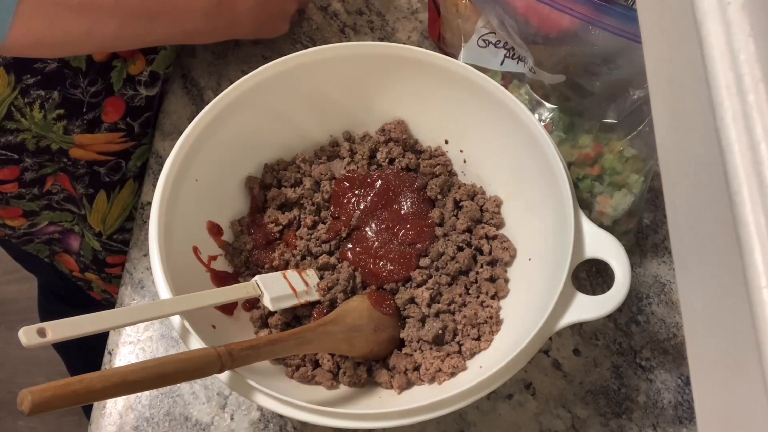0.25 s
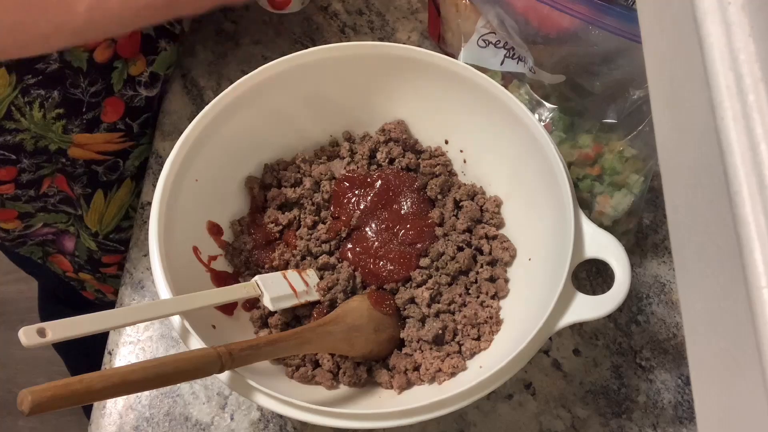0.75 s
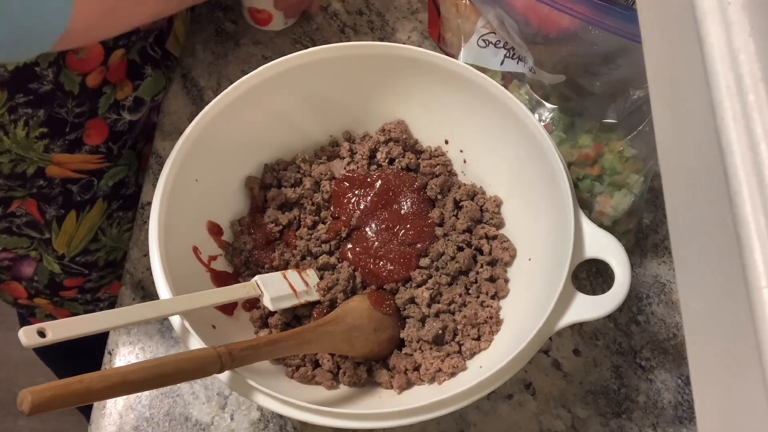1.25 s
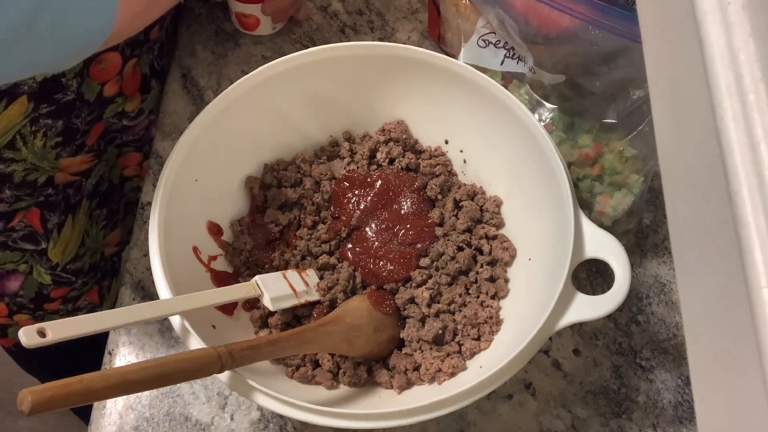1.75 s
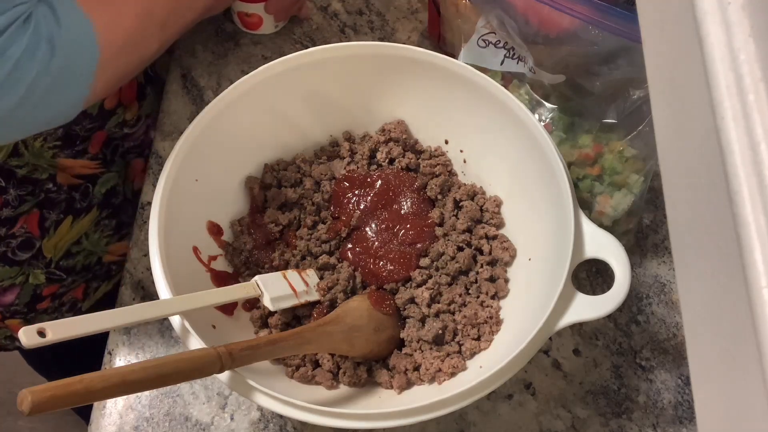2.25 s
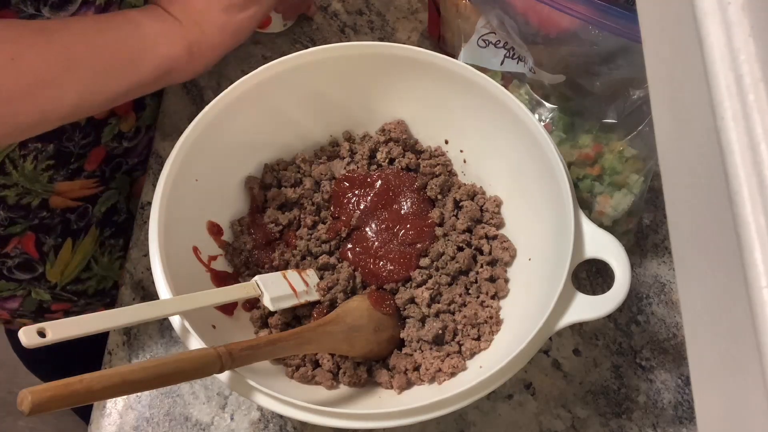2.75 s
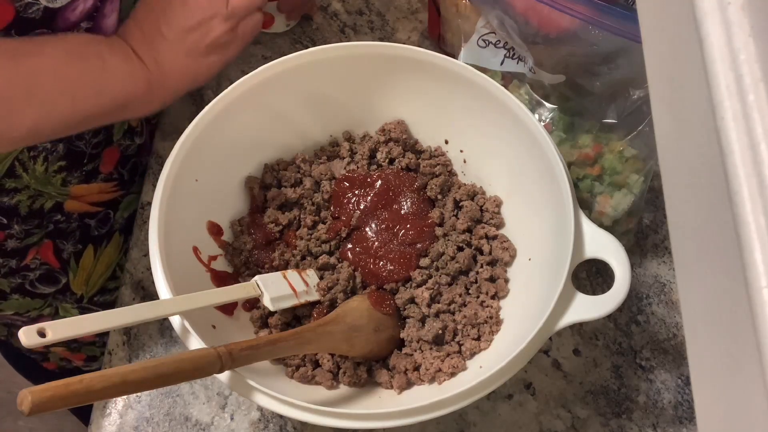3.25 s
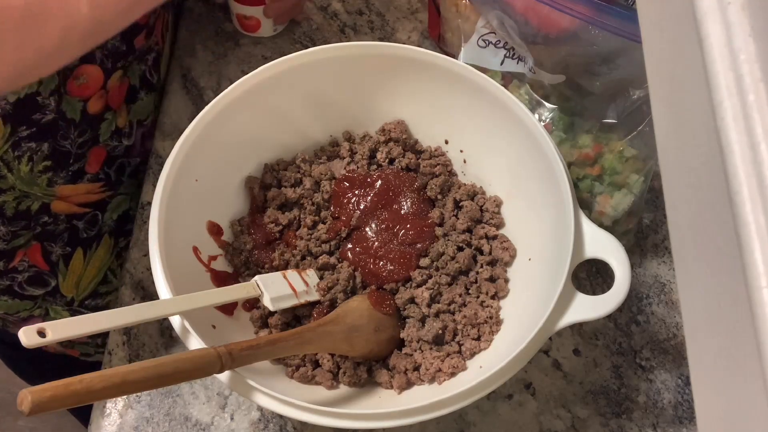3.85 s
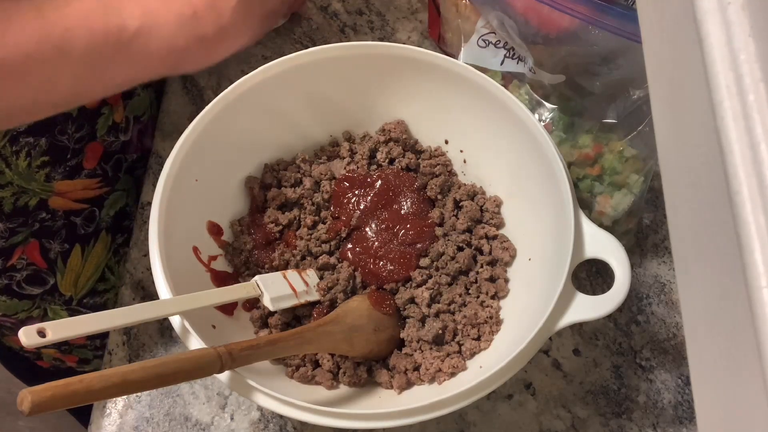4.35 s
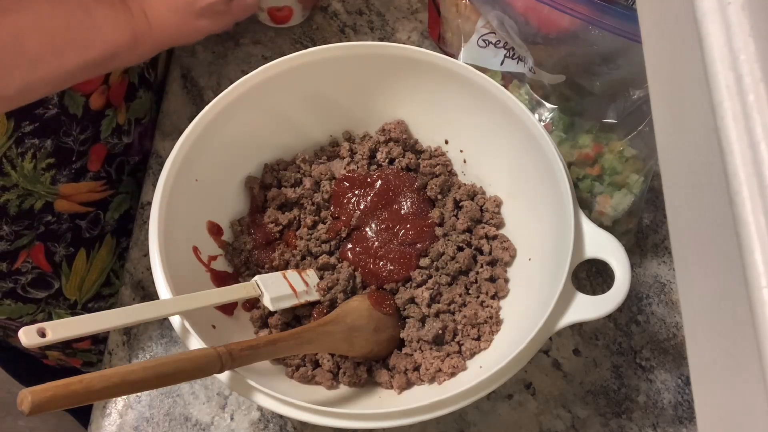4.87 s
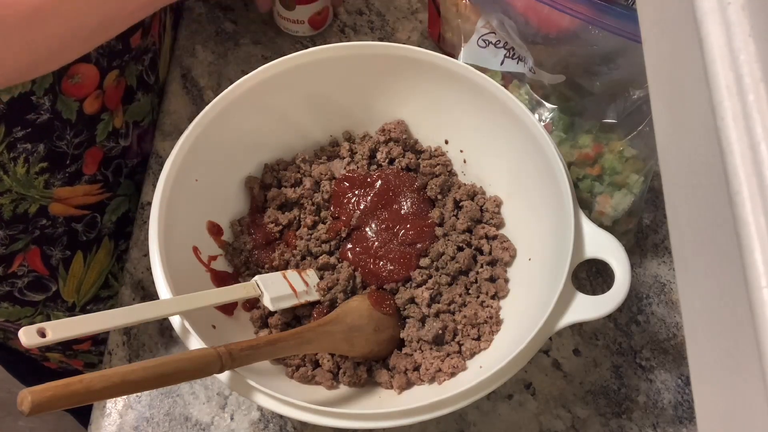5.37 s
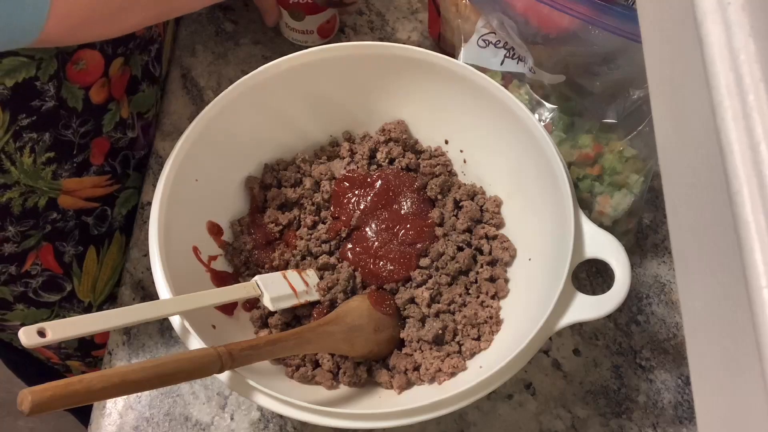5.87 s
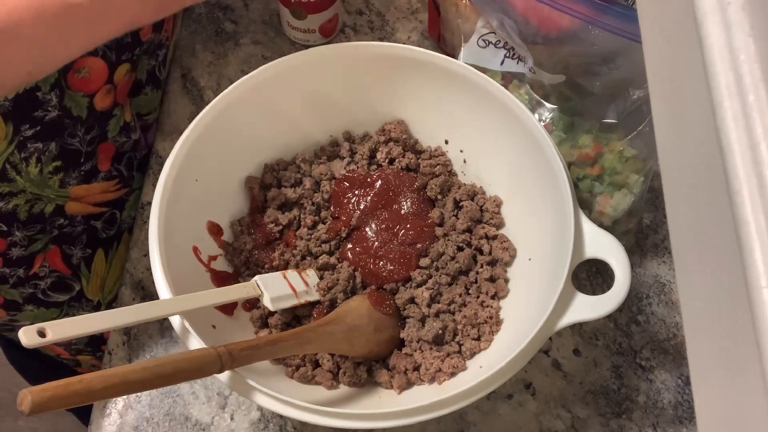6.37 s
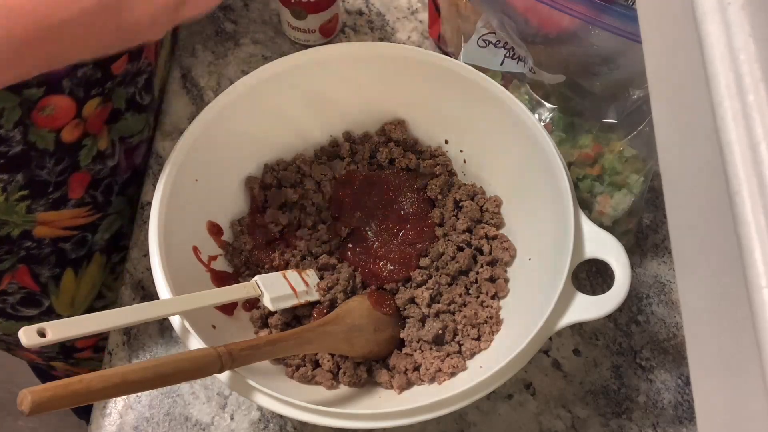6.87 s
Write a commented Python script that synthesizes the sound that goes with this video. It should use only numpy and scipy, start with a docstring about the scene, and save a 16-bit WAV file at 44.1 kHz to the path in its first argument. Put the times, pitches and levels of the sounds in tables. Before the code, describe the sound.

A can opener's jaws snap with a loud, briefly ringing clack at about 0.4 seconds. From 0.6 to 1.1 seconds plastic ticks and crackles close by, while two things thud onto a stone counter. A tin slides faintly, then clinks and scrapes sharply at about 2.1 seconds. A quieter stretch follows, with soft hand bumps, rubbing, light scrapes and small taps. At about 4.9 seconds the opener drops with a hard, bright clatter and a short rustle, followed by sharp plastic ticks, the strongest near 5.2 seconds. The tin clinks and scrapes lightly between 5.5 and 5.9 seconds, and plastic ticks again. From 6.5 seconds a wooden drawer slides on rough runners, and a few dull thuds come at around 7 seconds. A fridge hums faintly throughout, and the kitchen walls add short echoes.

```python
"""A can opener and a tin are handled on a stone kitchen counter. The opener's jaws clack, and later it is
dropped; the tin scrapes over grit and clinks. Each knock rings a few fading tones of the thing that is hit.
Soft things thud, hands bump and rub, plastic ticks and rustles, and at the end a wooden drawer slides on
rough runners. A fridge hums under it all, and the walls add short echoes."""
import sys
import numpy as np
from scipy import signal
from scipy.io import wavfile

SR = 44100
rng = np.random.default_rng(int(sys.argv[2]) if len(sys.argv) > 2 else 0)


def waveform_to_disk(signal):
    """Save audio, clipped to [-1, 1], as 16-bit WAV at the path in sys.argv[1]."""
    frames = np.transpose(np.atleast_2d(signal))
    scaled = np.clip(frames, -1, 1) * 32767
    samples = np.round(scaled).astype(np.int16)
    wavfile.write(sys.argv[1], SR, samples)


N = 313992

# Levels are relative. t60 is the time to fade by 60 dB. A mode is a tone that a thing rings at.
# fridge hum: f/Hz, width/Hz, level/dB
FRIDGE_HUM = [(63, 6.1, -65), (151, 13, -70), (228, 4.5, -68.5), (364.6, 22, -68), (469, 22, -73)]
# tone color of room air, leaning, rubbing and rustling: f/Hz, level/dB
AIR_COLOR = [(15, -38), (25, -15.5), (59, -8), (114, -13), (236, -1.5), (293, -0.5), (373, -14), (775, -16),
             (2280, -17), (7310, -37), (10400, -30), (13600, -44), (16000, -72)]
LEAN_COLOR = [(24, -27.5), (40, -5), (113, 1.5), (482, -5.5), (563, -18), (625, -8.5), (900, -17),
              (1170, -44.5), (1980, -120)]
RUB_COLOR = [(290, -35.5), (500, -10), (647, -5.5), (912, -8), (1080, -5), (1330, -6.5), (1970, -13),
             (6500, -31.5), (8450, -59), (14300, -120)]
RUSTLE_COLOR = [(2650, -21), (4500, 2.5), (5930, -10), (6590, -5), (7260, -3.5), (8330, -10), (13100, -3.5),
                (14500, -4), (16000, -26.5)]
# hands, sleeves and bags moving: t/s, leaning level/dB, rubbing level/dB, rustling level/dB
HAND_MOVES = [(0.0, -61, -69.5, -108), (0.36, -60, -68, -101), (0.5, -58.5, -64.5, -78),
              (0.79, -55.5, -63, -64), (1.19, -56, -57, -71.5), (1.63, -57.5, -66.5, -77),
              (2.08, -56.5, -60, -76.5), (2.26, -50.5, -56.5, -59), (2.52, -61.5, -68, -87.5),
              (3.11, -59.5, -69.5, -78.5), (3.45, -64.5, -73, -93.5), (3.86, -58.5, -66, -102),
              (4.28, -61, -74.5, -86), (4.68, -55.5, -63, -71), (4.82, -49.5, -62.5, -66.5),
              (4.94, -55, -48.5, -39.5), (5.1, -54.5, -89, -65), (5.29, -56.5, -67.5, -73),
              (5.69, -56.5, -66.5, -104.5), (6.01, -64, -67.5, -76.5), (6.31, -65, -71, -79.5),
              (6.58, -60, -75.5, -74.5), (6.76, -54, -46, -57.5), (6.86, -52, -54, -63),
              (7.12, -57.5, -58.5, -55.5)]
# knocks: t/s, level/dB, favored f/Hz, ring length (0-1), crack against ring/dB
OPENER_CLACKS = [(.129, -44, 1290, 0.4, -20.5), (.151, -44, 1288, 0.6, -21),
                 (.3303, -12.5, 1020, 0.34, -4.5), (.3668, -2, 1200, 0.2, -12),
                 (.3718, -11, 1247, 0.2, -15), (.3765, -19, 850, 0.4, -25.5), (.383, -20, 900, 0.2, -22),
                 (.394, -19, 1000, 0.6, -25.5), (.404, -26.5, 950, 0.4, -23),
                 (.42, -33.5, 1050, 0.9, -25.5)]
SOFT_THUDS = [(.372, -29.5, 204, 0.8, -49.5), (.691, -20.5, 900, 0.34, -10.5), (.862, -20.5, 734, 0.7, -12),
              (.875, -25.5, 152, 1, -34), (1.518, -39.5, 451, 0.99, -1), (2.11, -30, 180.4, 1, -35),
              (2.25, -32.5, 290, 1, -23), (3.623, -35, 636, 1, -46), (3.779, -35.5, 654, 0.9, -2.5),
              (3.905, -40, 204, 0.32, -27.5), (4.39, -41, 330, 1, -36), (4.885, -40.5, 559, 1, -15),
              (4.938, -43, 150.6, 0.8, -29), (5.578, -39, 472, 0.56, -17), (5.876, -39, 485, 0.76, -30.5),
              (5.712, -37.5, 194, 0.96, -29), (6.558, -39.5, 244.6, 0.52, -28), (6.93, -40, 107, 0.7, -24),
              (6.95, -35, 107, 0.1, -32), (6.985, -35, 90, 0.52, -27), (7.012, -38, 92, 0.25, -38),
              (7.06, -41, 89, 1, -27), (7.084, -38, 500, 0.6, -17), (7.091, -24, 239, 0.52, -30),
              (7.106, -21.5, 101, 1, -39)]
TIN_CLINKS = [(2.066, -28, 736, 1, 4), (2.068, -26, 3370, 0.7, -1), (2.074, -32, 1050, 0.5, 4),
              (2.083, -45, 3400, 0.5, -13), (2.094, -16.5, 1040, 1, -29), (2.101, -26, 1740, 0.5, -24),
              (2.1035, -17, 1254, 0.16, -8), (2.106, -40, 3600, 0.6, -16), (2.11, -19.5, 1750, 0.15, -23),
              (2.113, -17.5, 1264, 0.5, -14), (2.114, -46, 3430, 0.5, -25), (2.12, -27.5, 1710, .35, -37.5),
              (4.310, -35.5, 1470, 0.1, -5.5), (4.311, -39.5, 4200, 0.1, 5.5),
              (4.377, -49.5, 4500, 0.15, 8), (4.721, -42, 1673, 1, 4), (4.883, -22, 533, 0.73, -18),
              (4.8845, -16.5, 4700, 0.1, 3), (4.885, -29.5, 1600, 0.04, 1), (4.8895, -30, 533, 0.53, -13),
              (5.576, -38.5, 2030, 0.53, -14), (5.577, -50, 2800, 0.5, -16), (5.708, -40, 2100, 0.17, 0),
              (5.711, -46, 5320, 0.6, -11), (5.745, -49, 2150, 0.5, -29.5), (5.783, -50.5, 1700, 0.9, 4.5),
              (5.874, -31.5, 3330, 0.02, -2), (5.877, -36.5, 1670, 0.65, -19), (5.872, -36, 5000, 0.5, -3),
              (5.895, -47.5, 4250, 0.93, -17), (5.905, -49.5, 10700, 0.4, 12)]
HAND_BUMPS = [(2.80, -44, 300, 0.92, -33.5), (2.811, -45.5, 204, 0.53, -32), (2.826, -54, 229.5, 0.8, -34),
              (3.28, -45, 198.3, 0.72, -41.5), (3.292, -43, 393, 0.73, -42.5)]
# modes of the things that are hit: f/Hz, level/dB, t60/s
OPENER_MODES = [(750, -15, 0.03), (898, -18.5, 0.09), (1000, -10.5, 0.18), (1137, 1.5, 0.058),
                (1160, -5, 0.1), (1240, -3.5, 0.018), (1435, 2, 0.065), (1770, -10, 0.015),
                (2389, -11.5, 0.049), (2900, -24, .02), (3620, -3, 0.038)]
COUNTER_MODES = [(75, -8, .1), (105, -3, .1), (150, 0, .1), (222, -2, .07), (280, -4, .05), (370, -2, .05),
                 (463, -2, .045), (614, -5, .04), (861, -7, .03), (980, -8, .03), (1210, -10, .03),
                 (1520, -15, .025), (2370, -22, .02)]
TIN_MODES = [(465, -2, .05), (610, -4, .05), (1070, -5, .06), (1180, -7, .07), (1300, -5, .05),
             (1685, -3, .1), (1870, -9, .05), (2150, -4, .14), (2400, -8, .12), (2850, -13, .06),
             (3200, -5, .1), (3400, -12, .04), (3610, -11, .05), (3890, -15, .04), (4175, -6, .12),
             (4400, -18, .1), (4665, -6, .1), (5400, -16, .05), (6110, -8, .08), (8420, -13, .08),
             (10600, -18, .08), (11750, -22, .07)]
# scrapes and rubs over grit: the tin dragged, a light touch, the lid and other held things: t/s of hardest
# push, length/s, level/dB, hiss against ring/dB, favored f/Hz
SCRAPE_STROKES = [(0.325, 0.022, -42.5, -31.5, 1194), (0.362, 0.015, -34.5, -32.5, 1203),
                  (1.278, 0.47, -53, -44, 640), (1.2, 0.093, -75, -36, 960), (1.3, 0.12, -53, -28, 610),
                  (1.33, 0.064, -53, -16, 1080), (2.074, 0.019, -27.5, -16.5, 1090),
                  (2.106, 0.023, -18.5, -40.5, 1540), (2.108, 0.054, -26.5, -30.5, 3510),
                  (2.173, 0.092, -44.5, -49, 1916), (2.212, 0.062, -40.5, -31.5, 1490),
                  (2.231, 0.12, -35.5, -36.5, 2260), (2.809, 0.051, -54, -8, 1400),
                  (2.855, 0.14, -58.5, -29, 1250), (3.258, 0.24, -73, 2.5, 3330),
                  (3.532, 0.083, -77, 6.5, 3440), (3.832, 0.11, -58, -16, 1205), (3.95, 0.45, -85, -24, 3390),
                  (4.66, 0.076, -54, -26.5, 480), (4.72, .12, -48, -28, 650), (4.8, 0.08, -61.5, -24, 1160),
                  (4.728, 0.047, -42.5, -5, 1690), (4.873, 0.01, -41, -4, 3996), (5.109, 0.16, -53, -8, 1660),
                  (5.466, 0.56, -61, -21, 1140), (5.83, 0.096, -52, -23, 3760),
                  (5.85, 0.045, -46.5, -21, 4180), (5.908, 0.065, -70.5, -12, 3380),
                  (5.909, 0.0094, -60, -1, 4200)]
# plastic ticking: t/s, level/dB, f/Hz, dull part/dB, crackle afterwards/dB
PLASTIC_TICKS = [(.5375, -53, 13000, -15, -32), (.5735, -50, 12900, -12, -25),
                 (.617, -47.5, 13000, -20, -8), (.6215, -28.5, 12700, -24, -1),
                 (0.641, -20.5, 13500, -21, -9), (0.655, -16, 11640, -16, -7),
                 (.7275, -31, 12700, -25, -24), (0.8233, -28.5, 11000, -20.5, -14),
                 (.884, -34, 11000, -20.5, -23), (0.9065, -19.5, 11700, -17, -18),
                 (.944, -32, 11000, -11, -15), (0.957, -18, 11000, -12, -10), (1.0635, -28, 7640, -7.5, -8),
                 (1.519, -34, 9200, -24, -9), (1.606, -44, 8600, -21, -17), (3.7245, -35.5, 10100, -16, -4),
                 (4.6075, -35, 12150, -15, -26), (4.845, -38, 8000, -33, -20),
                 (5.0268, -20.5, 11500, -23, -23), (5.038, -40, 11000, -20, -25),
                 (5.169, -8, 10800, -21, -34), (5.2474, -24, 10300, -19.5, -15),
                 (6.063, -48, 10400, -36, -13.5), (6.078, -42.5, 12800, -22, -28),
                 (6.1095, -41.5, 10540, -18, -7), (6.1607, -47, 13300, -11, -16),
                 (6.2119, -29, 10900, -23, -10), (6.9523, -33, 8900, 1, -7), (7.087, -39, 6100, -19, -16)]
# the dropped opener landing: t/s, level/dB, t60/s
LANDINGS = [(4.876, -29, 0.1), (4.882, -15.5, 0.05), (4.8842, -7.5, 0.012), (4.8888, -14.5, 0.012),
            (4.965, -27.5, 0.026)]
# the drawer moving: t/s, level/dB, runners against box/dB
DRAWER_SLIDE = [(6.53, -60, -10), (6.546, -64, -18), (6.585, -47.5, -31.5), (6.63, -40, -35),
                (6.67, -38.5, -22), (6.71, -39.5, -7), (6.784, -43.5, -16), (6.794, -48, -1),
                (6.824, -38, -8.5), (6.836, -60, -8), (6.9, -81, -13)]
# modes of the scraped things, dropped opener and drawer box: f/Hz, width/Hz, level/dB
SCRAPE_MODES = [(475, 40, 1), (650, 90, -6), (960, 70, -5), (1159, 100, 1), (1311, 55, -3.5),
                (1490, 45, -5), (1685, 40, 1), (1760, 45, -7), (1900, 60, -2), (2040, 50, -9),
                (2200, 30, 4), (3190, 50, -4), (3393, 60, -1), (3620, 60, -2), (3890, 120, -8.5),
                (4090, 43, -5.5), (4680, 76, -12.5), (5790, 220, -9)]
DROP_MODES = [(494, 68, 0), (612, 8.7, 8), (1184, 29, -5.5), (1470, 17, -0.5), (1800, 78, -5.5),
              (2410, 190, -7), (4224, 350, -3.5), (4680, 590, -6.5), (5700, 330, -6), (7950, 50, 5.5),
              (8100, 120, 5), (10760, 40, 1.5), (10600, 120, -2), (11300, 80, -9), (13270, 73, 4.5)]
DRAWER_MODES = [(204.3, 20.3, 5), (391.5, 76, 2.5), (603, 170, -2), (880, 7.1, 8), (1246, 45, -8.5),
                (1724, 40, -4.5), (2010, 25, -4), (2624, 48, -8), (2830, 17, -9)]
# how alike left and right sound: f/Hz, likeness (1 = the same, 0 or less = unrelated)
STEREO_LIKENESS = [(60, 0.9), (180, 0.8), (550, -0.23), (1650, -0.37), (4970, 0.45), (15000, 0.2)]
# how long the kitchen rings: f/Hz, t60/s
ROOM_FADE = [(64, 0.54), (250, 0.24), (1000, 0.24), (4000, 0.2), (15000, 0.16)]
# echoes from near walls and cupboards: t/s of delay, level/dB
WALL_ECHOES = [(.0048, -4.5), (.0092, -12), (0.0154, -10.5), (0.028, -15.5)]


def amp(db):
    """Turn decibels into a gain."""
    return 10 ** (np.asarray(db) / 20)


def unit_level(x):
    """Scale a signal to an average power of 1."""
    return x / np.sqrt(np.mean(x ** 2) + 1e-20)


def over_time(rows):
    """Join each column of levels with straight lines; silent outside the table."""
    times, *columns = np.transpose(rows)
    return [np.interp(np.arange(N) / SR, times, db, left=-150, right=-150) for db in columns]


def at_hz(points, hz):
    """Read a table's value at one frequency."""
    freqs, values = np.transpose(points)
    return np.interp(np.log(hz), np.log(freqs), values)


def drift(rate_hz):
    """A slow random wobble of about size 1."""
    step = 40   # samples between points
    pole = np.exp(-2 * np.pi * rate_hz * step / SR)
    slow = signal.lfilter([1], [1, -2 * pole, pole ** 2], rng.standard_normal(N // step + 2002))[2000:]
    return np.interp(np.arange(N) / step, np.arange(len(slow)), unit_level(slow))


def filtered(x, hz, kind, order=2):
    """Keep the low part, the high part or one band of a sound."""
    return signal.sosfilt(signal.butter(order, hz, kind, fs=SR, output="sos"), x)


def resonate(x, hz, width_hz):
    """Ring at one pitch; a smaller width rings longer."""
    r = np.exp(-np.pi * width_hz / SR)
    feedback = [1, -2 * r * np.cos(2 * np.pi * hz / SR), r * r]
    return signal.lfilter(np.array([1, 0, -1]) * (1 - r * r) / 2, feedback, x)


def grains(per_s, spread_db):
    """Tiny contacts of uneven size at random times."""
    sizes = amp(spread_db * np.minimum(rng.exponential(1, N), 4.0)) * rng.choice([-1, 1], N)
    return unit_level(sizes * (rng.random(N) < per_s / SR))


def colored(color, flicker_db, noise=None):
    """Shape noise into flickering half-octave bands, in stereo."""
    if noise is None:
        noise = rng.standard_normal((2, 2, N))
    out, edges = 0, 25 * 2 ** np.arange(0, 9.6, .5)
    for k, (low, high) in enumerate(zip(edges, edges[1:])):
        if color[0][0] <= high and low <= color[-1][0]:
            hz = np.sqrt(low * high)
            mid, side = filtered(noise[k % 2], [low, high], "band")   # next-door bands are unrelated
            alike = np.clip(at_hz(STEREO_LIKENESS, hz), 0, 1)
            gain = amp(at_hz(color, hz) + flicker_db * drift(4.8))
            out = out + gain * (np.sqrt(1 + alike) * mid + np.sqrt(1 - alike) * side * [[1], [-1]])
    return unit_level(out)


def knocks(events, modes, focus_db, scatter_db, crack_hz, detune, contact_s):
    """A knock is a short crack plus ringing modes, strongest near its favored pitch."""
    out, t = np.zeros(N + SR), np.arange(SR // 7) / SR
    for s, peak_db, favored_hz, length, crack_db in events:
        strengths, shifts = rng.standard_normal((2, len(modes)))
        knock = np.zeros(len(t))
        for (hz, db, t60), strength, shift in zip(modes, strengths, shifts):
            hz *= 1 + detune * shift   # grip and place shift the modes a little
            age = np.maximum(t - abs(shift) * 0.39 / hz, 0)   # low modes start later
            level_db = db + scatter_db * strength - focus_db * np.log2(hz / favored_hz) ** 2
            fade_db = 60 * age / (t60 * np.clip(length, .05, 1))
            knock += amp(level_db - fade_db) * np.sin(2 * np.pi * hz * age)
        knock *= np.clip(t / contact_s, 0, 1)   # the contact takes a moment to build
        knock /= np.abs(knock).max()
        crack = filtered(rng.standard_normal(400), [crack_hz / 20, crack_hz], "band")
        knock[:400] += amp(crack_db - 60 * t[:400] / 0.032) * crack
        out[round(s * SR):][:len(t)] += amp(peak_db) * knock
    return out[:N]


def shaken_body(contacts, modes, broad_db, waver_db):
    """Contacts ring modes that come and go as the hold shifts; broad noise fills the gaps."""
    rings = sum((-1) ** k * amp(db + waver_db * drift(10.0)) * resonate(contacts, hz, width)
                for k, (hz, width, db) in enumerate(modes))
    return unit_level(rings + amp(broad_db) * resonate(contacts, 2100, 2500))


def fridge(air_db=-68):
    """Wavering hum tones over the still air of the room."""
    hum = 0
    for hz, width, db in FRIDGE_HUM:
        tone = resonate(rng.standard_normal(N), hz, width)
        hum += amp(db) * unit_level(resonate(tone, hz, width))
    return hum + amp(air_db) * colored(AIR_COLOR, flicker_db=1.1)


def hands(blows, shiver_t60_s=0.58, stray_ticks_per_s=37):
    """Leaning rumbles, rubbing hisses, plastic rustles; hard blows set loose things shivering."""
    lean_db, rub_db, rustle_db = over_time(HAND_MOVES)
    decay = amp(-120 / (shiver_t60_s * SR))
    shiver = np.sqrt(signal.lfilter([1], [1, -decay], blows ** 2) / (.01 * SR))
    leaning = colored(LEAN_COLOR, flicker_db=1.5)
    rubbing = colored(RUB_COLOR, flicker_db=1.2)
    crinkle = np.array([grains(4900, spread_db=-4.0) for _ in range(4)]).reshape(2, 2, N)
    rustle = colored(RUSTLE_COLOR, flicker_db=0.84, noise=crinkle)
    rustle *= amp(2.7 * drift(40))   # it comes in clumps
    stray_ticks = amp(14) * rng.standard_normal(N) * (rng.random(N) < stray_ticks_per_s / SR)
    rustle += 2 * resonate(resonate(stray_ticks, 11000, 7000), 11000, 7000)
    return (amp(lean_db) * leaning
            + (amp(rub_db) + amp(-30) * shiver) * rubbing
            + (amp(rustle_db) + amp(-40) * shiver) * rustle)


def opener_clacks():
    """The jaws snap, and the opener rings with a bright crack."""
    return knocks(OPENER_CLACKS, OPENER_MODES, focus_db=5.0, scatter_db=1.5,
                  crack_hz=14500, detune=.01, contact_s=.0009)


def scrapes(rise_share=0.59, edge_db=-19):
    """Grit rings the scraped thing, most near the pitch the grip leaves free; the finest grit hisses."""
    out, grit = np.zeros(N), grains(4000, spread_db=3.5)
    rings = [amp(db) * resonate(grit, hz, width) for hz, width, db in SCRAPE_MODES]
    ring_size = np.std(sum(rings))
    hiss = unit_level(resonate(resonate(grit, 9500, 7000), 5500, 7600))
    broad = unit_level(resonate(grit, 3000, 5800))
    for s, length, db, hiss_db, favored_hz in SCRAPE_STROKES:
        rise, fall = rise_share * length, (1 - rise_share) * length
        now = np.arange(round((s - 2 * rise) * SR), round((s + 2 * fall) * SR))
        from_peak = np.maximum((s - now / SR) / rise, (now / SR - s) / fall)
        pressure = amp(db + edge_db * from_peak)
        ringing = sum(ring[now] * amp(-20.0 * abs(np.log2(hz / favored_hz)))
                      for ring, (hz, _, _) in zip(rings, SCRAPE_MODES))
        out[now] += pressure * (2 * ringing / ring_size + amp(hiss_db) * hiss[now]
                                + amp(-10.5) * broad[now])
    return out


def soft_thuds():
    """Soft things are set down and briefly ring the stone counter."""
    return knocks(SOFT_THUDS, COUNTER_MODES, focus_db=4.5, scatter_db=2.0,
                  crack_hz=3500, detune=.05, contact_s=.0014)


def plastic_ticks(tick_t60_s=0.0025, settle_t60_s=0.08):
    """Each tick is a tiny burst of cracks; the plastic crackles on as it settles."""
    t = np.arange(3000) / SR
    out = np.zeros(N + len(t))
    for s, peak_db, hz, dull_db, settle_db in PLASTIC_TICKS:
        noise, settle_noise = rng.standard_normal((2, len(t)))
        cracks = noise * amp(-60 * t / tick_t60_s)
        cracks /= np.abs(cracks).max()
        crackle = settle_noise * noise ** 2 / 6   # uneven cracks, the tall ones near 1
        cracks += amp(settle_db - 60 * t / settle_t60_s) * crackle * np.clip(t / .002, 0, 1)
        bright = resonate(resonate(cracks, hz, 0.57 * hz), hz, 0.57 * hz)
        tick = bright + amp(dull_db) * resonate(cracks, 3800, 3500)
        out[round(s * SR):][:len(t)] += amp(peak_db) * tick / np.abs(tick).max()
    return out[:N]


def tin_clinks():
    """Sharp taps ring the tin's many high modes."""
    return knocks(TIN_CLINKS, TIN_MODES, focus_db=12.0, scatter_db=2.5,
                  crack_hz=11000, detune=.004, contact_s=.001)


def hand_bumps():
    """A padded hand meets the stone slowly, so the bump is dull."""
    return knocks(HAND_BUMPS, COUNTER_MODES, focus_db=10.0, scatter_db=2.0,
                  crack_hz=800, detune=.05, contact_s=.007)


def opener_drop(crack_t60_s=0.018):
    """Each landing is a hard crack and a rush of contacts that dies fast."""
    t, loudness = np.arange(N) / SR, 0
    for s, db, t60 in LANDINGS:
        age = np.clip(t - s, 0, 1)
        rush, crack = amp(-60 * age / t60), amp(-1.0 - 60 * age / crack_t60_s)
        loudness += (t >= s) * amp(db) * (rush + crack)
    contacts = grains(9000, spread_db=2.2)
    ringing = shaken_body(contacts, DROP_MODES, broad_db=-7.5, waver_db=-5.5)
    broad = unit_level(resonate(contacts, 5600, 8600))
    hiss = unit_level(resonate(contacts, 7300, 4100))
    return amp(-9.5) * loudness * (ringing + amp(-5.0) * broad + amp(-6.5) * hiss)


def drawer():
    """Rough runners rasp and shake the hollow wooden box."""
    slide_db, rasp_db = over_time(DRAWER_SLIDE)
    grit = grains(1500, spread_db=2.5)
    rasp = unit_level(resonate(grit, 1270, 160) + amp(-12.0) * resonate(grit, 1330, 160)
                      + amp(-28.0) * resonate(grit, 1900, 130))
    box = shaken_body(grit, DRAWER_MODES, broad_db=-24.0, waver_db=-2.4)
    return amp(slide_db) * (box + amp(rasp_db) * rasp)


def kitchen(x, tail_db=-29.5, tilt_db_per_octave=-1, right_lag_samples=3):
    """The direct sound, a few near echoes that differ between the ears, and a fading tail."""
    t = np.arange(SR // 2) / SR
    response = np.zeros((2, len(t)))
    for low in 45 * 2. ** np.arange(9):
        mid_hz = np.sqrt(2) * low
        shared, own = rng.standard_normal(len(t)), rng.standard_normal((2, len(t)))
        alike = np.clip(at_hz(STEREO_LIKENESS, mid_hz), 0, 1)
        noise = np.sqrt(alike) * shared + np.sqrt(1 - alike) * own
        tail = noise * amp(-60 * t / at_hz(ROOM_FADE, mid_hz))
        gain = amp(tilt_db_per_octave * np.log2(max(low, 500) / 1000))
        response += gain * filtered(tail, [low, min(2 * low, .45 * SR)], "band")
    response *= amp(tail_db) * np.clip(t / 0.006, 0, 1)   # the walls answer late
    response[[0, 1], [0, right_lag_samples]] += 1   # the direct sound
    echoes = np.zeros_like(response)
    for s, db in WALL_ECHOES:
        arrivals = (s * SR + rng.uniform(-6, 6, 2)).astype(int)
        echoes[[0, 1], arrivals] += amp(db)
    response += filtered(echoes, 2500, "low")   # uneven surfaces scatter the treble
    return signal.fftconvolve(x[None], response, axes=1)[:, :N]


def scene():
    """Mix all the sounds in stereo; knocks, scrapes and ticks echo in the kitchen."""
    blows = opener_clacks() + soft_thuds() + hand_bumps() + tin_clinks() + opener_drop()
    sliding = scrapes() + amp(-2.5) * drawer()
    ticks = plastic_ticks()
    room_share = 0.25   # the plastic is close to the microphone and stirs the room less
    close_ticks = (1 - room_share) * np.array([ticks, np.roll(ticks, 2)])   # right is 2 samples late
    room = kitchen(blows + sliding + room_share * ticks)
    return room + close_ticks + hands(blows + ticks) + fridge()


def record(dry):
    """The microphone drops the deep bass, rounds off peaks and cuts the highest treble."""
    heard = filtered(dry, 46.0, "high", order=4)
    heard += 0.15 * filtered(heard, 170, "low", order=1) * [[1], [-1]]   # the bass leans left
    heard -= 0.37 * resonate(heard, 7250, 910)   # a small dip in the treble
    heard = filtered(heard, 15500, "low", order=4)
    heard = .93 * np.tanh(heard / .93)
    return signal.sosfilt(signal.cheby2(10, 60, 16600, fs=SR, output="sos"), heard)


dry = scene()
out = record(dry)
waveform_to_disk(out)
```